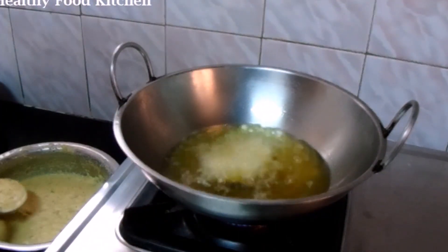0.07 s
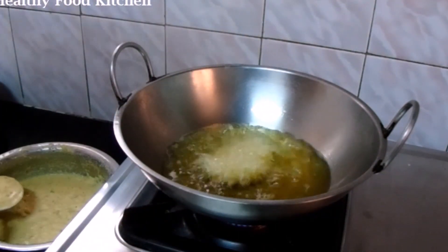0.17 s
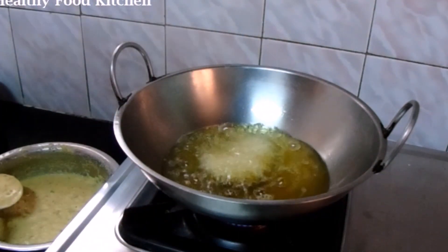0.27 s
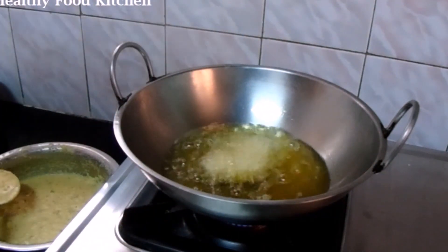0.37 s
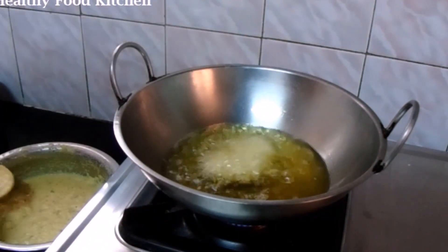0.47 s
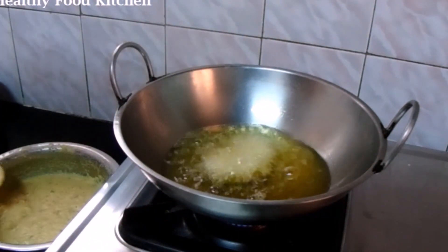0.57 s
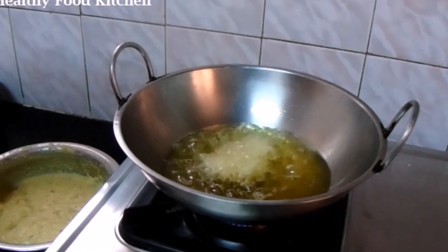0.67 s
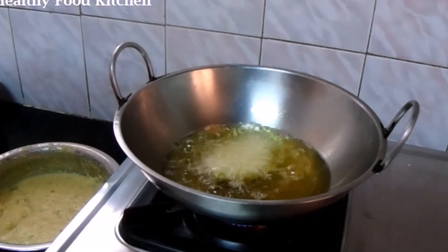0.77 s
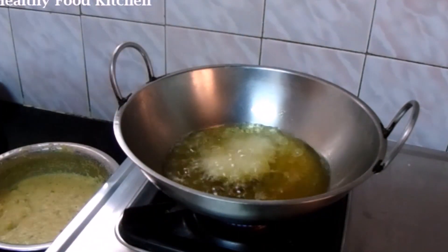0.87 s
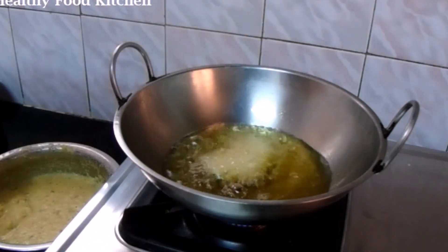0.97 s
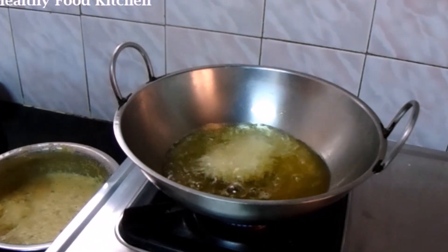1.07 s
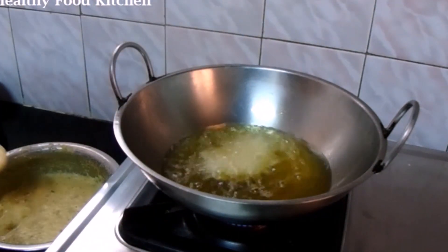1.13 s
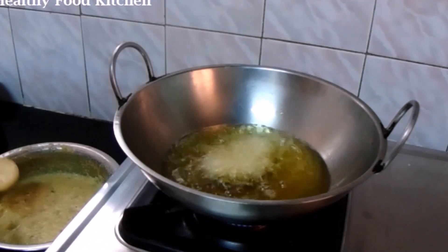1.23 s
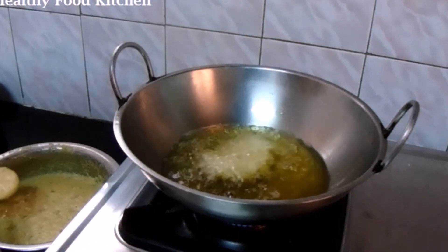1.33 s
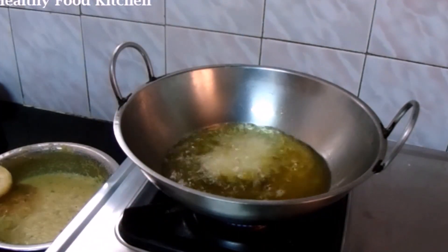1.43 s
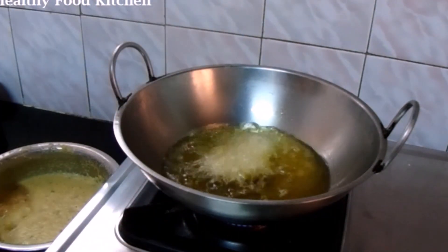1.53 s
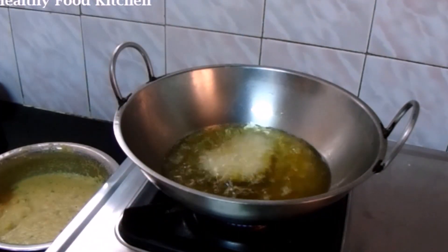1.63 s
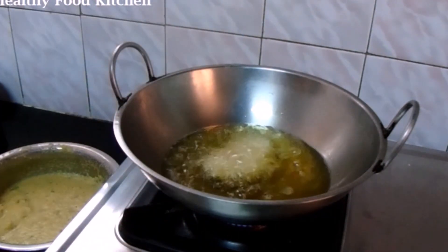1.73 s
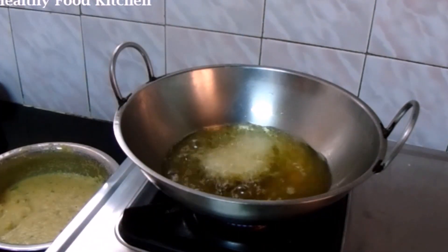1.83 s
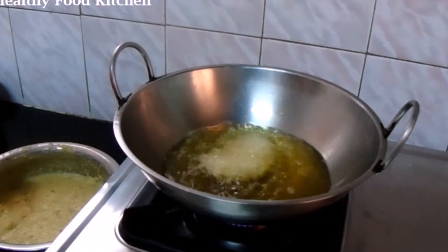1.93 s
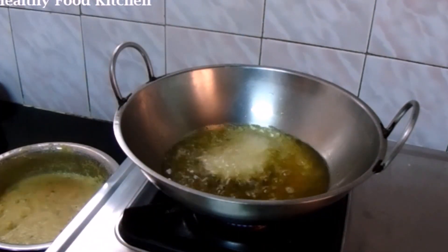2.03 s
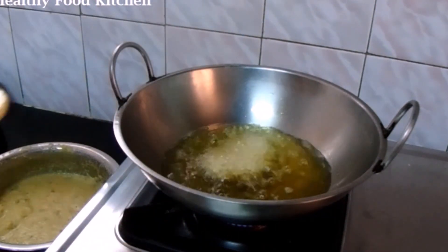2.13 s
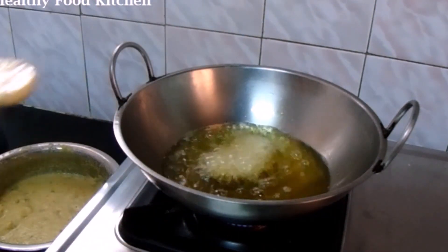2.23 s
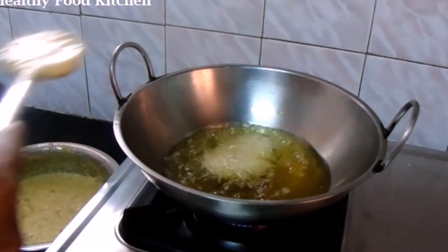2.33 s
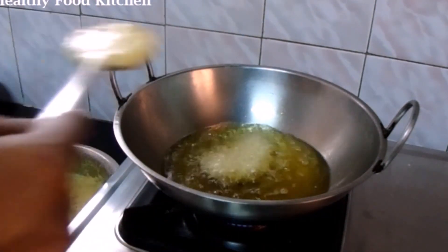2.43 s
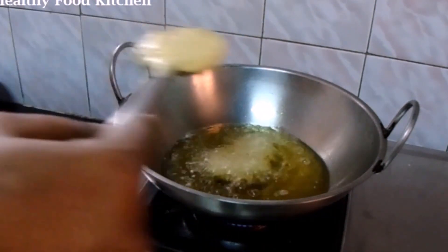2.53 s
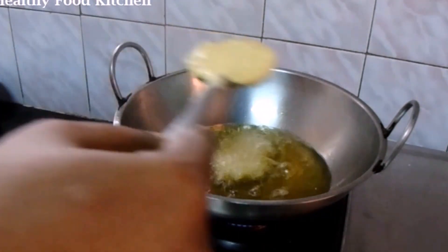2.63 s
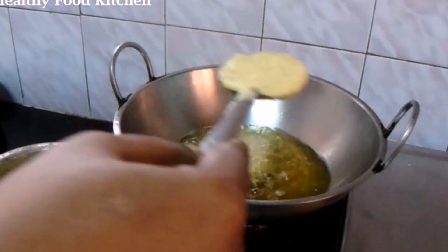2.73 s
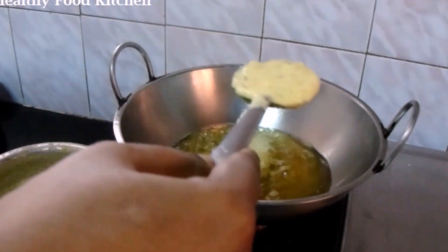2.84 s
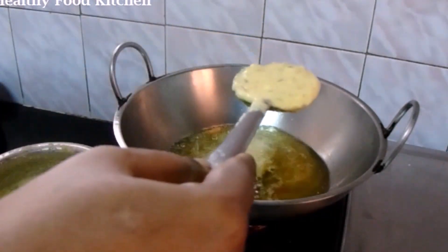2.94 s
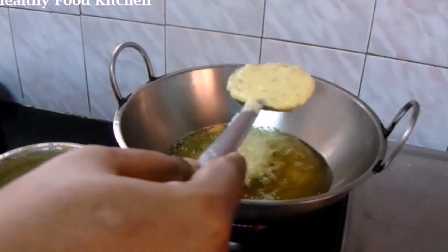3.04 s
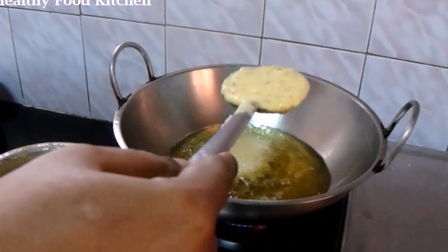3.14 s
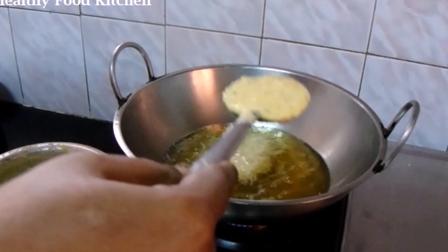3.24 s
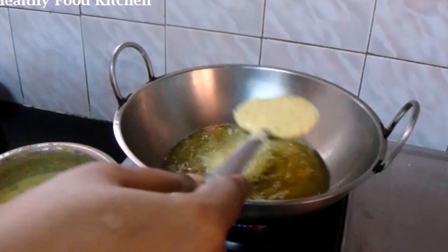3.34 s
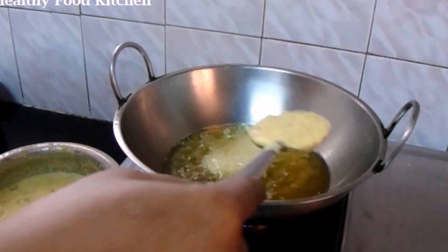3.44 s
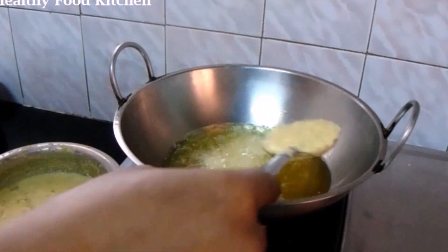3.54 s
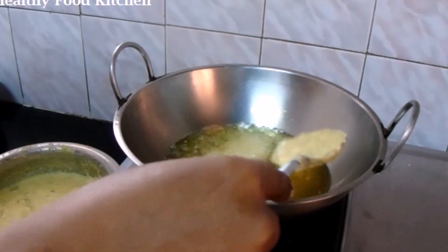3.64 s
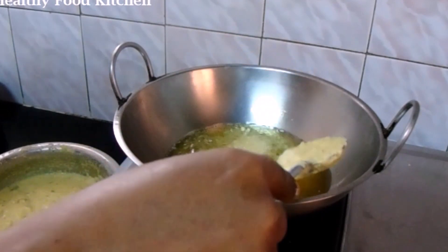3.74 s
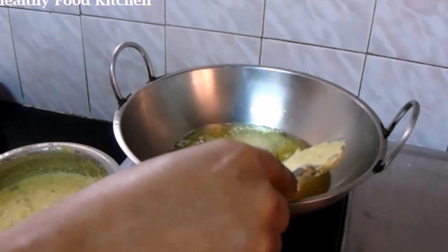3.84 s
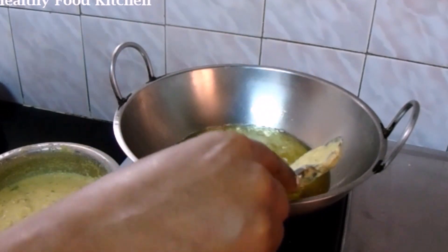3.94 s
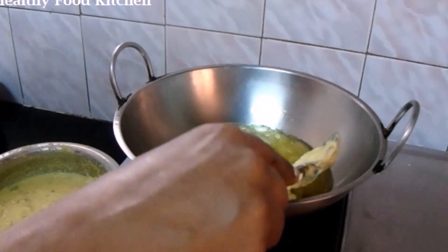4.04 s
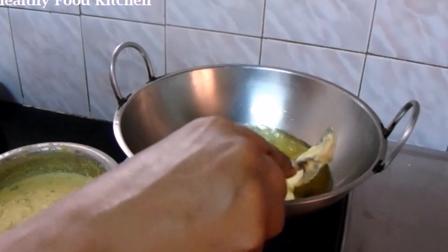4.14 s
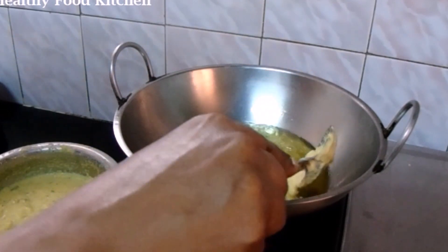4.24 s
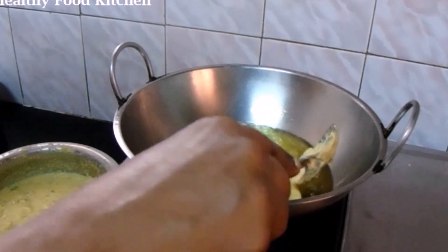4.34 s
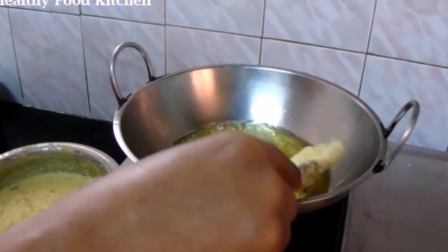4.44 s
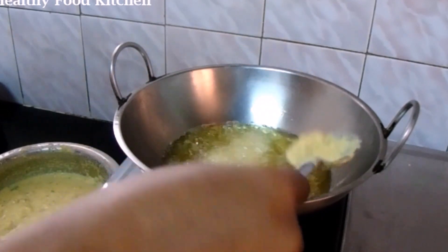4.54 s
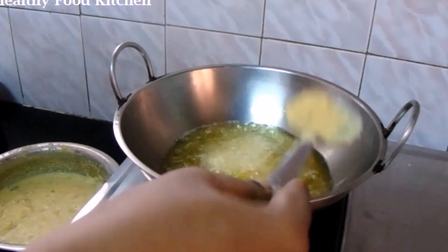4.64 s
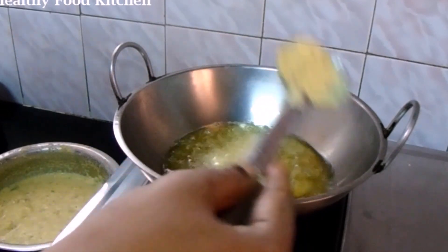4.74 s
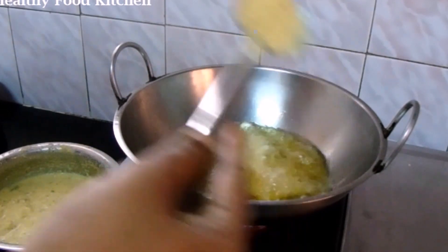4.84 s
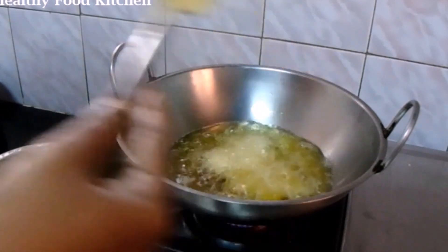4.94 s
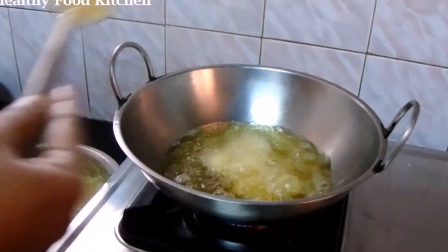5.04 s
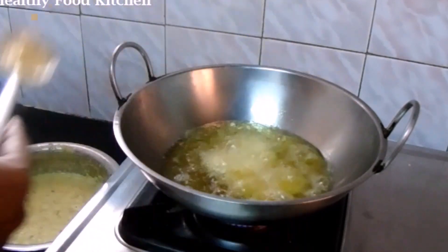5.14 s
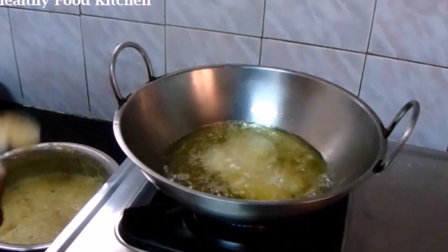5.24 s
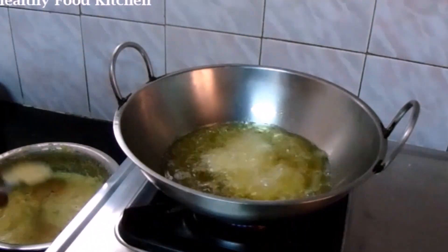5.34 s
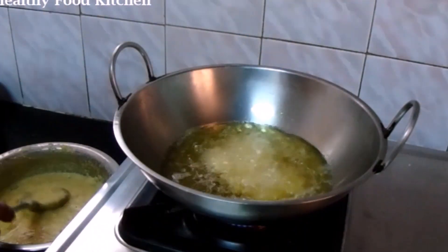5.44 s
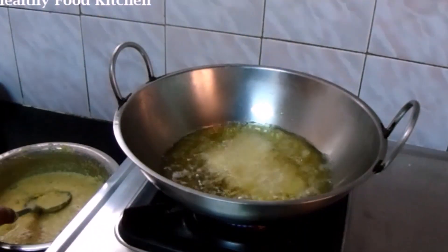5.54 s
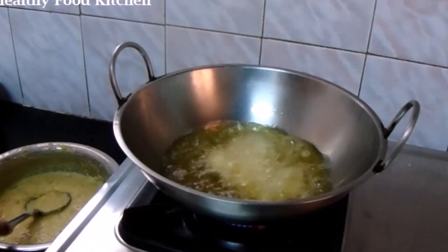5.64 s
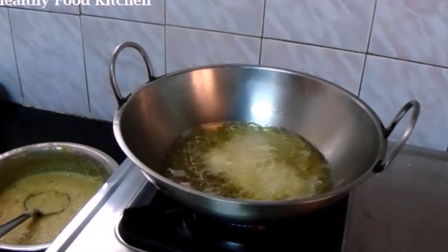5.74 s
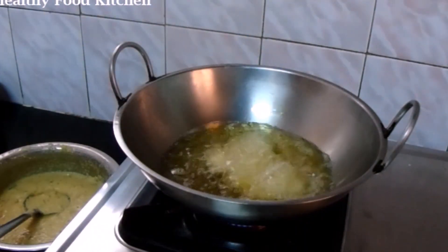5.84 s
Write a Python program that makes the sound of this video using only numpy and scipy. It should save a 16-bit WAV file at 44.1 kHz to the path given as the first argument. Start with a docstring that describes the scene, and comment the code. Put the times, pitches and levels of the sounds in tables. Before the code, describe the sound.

Batter sizzles and crackles in a wok of hot oil, swelling louder and brighter as another ladleful slides in.

```python
"""Batter frying in a wok

A steel wok of hot oil sits on a humming gas ring in a tiled kitchen. Countless steam bubbles burst
and ring in the bowl, with a few sharper spits, ringing blips and brief, hollow stutters. At about
four seconds a second ladle of batter slides in, and the sizzle swells and brightens."""
import sys
import numpy as np
from scipy import signal
from scipy.fft import rfft, irfft
from scipy.io import wavfile

SR = 44100
rng = np.random.default_rng(int(sys.argv[2]) if len(sys.argv) > 2 else 0)


def transcribe(u):
    """Save the signal u as a 16-bit wav file named by the first command-line argument.

    u: samples, shape (n,) or (channels, n), limited to [-1, 1]; the rate is SR.
    q: integer samples, one column per channel.
    """
    v = np.clip(np.atleast_2d(u).T, -1, 1)
    q = np.round(v * 32767).astype(np.int16)
    wavfile.write(sys.argv[1], SR, q)


N = 260190
TIME = np.arange(N) / SR
SEALED_S, SEAL_TAKES_S = 4.88, 0.19  # when the skin of the fresh batter seals, and how long it takes


def from_db(db):
    """Turn decibels into a factor to multiply by."""
    return 10 ** (np.asarray(db) / 20)


def rms_one(x):
    """Scale a sound to an average strength (rms) of one."""
    return x / np.sqrt(np.mean(x ** 2) + 1e-20)


def band(x, low_hz, high_hz):
    """The part of a sound between two frequencies."""
    edges = [max(low_hz, 10), min(high_hz, .45 * SR)]
    return signal.sosfilt(signal.butter(2, edges, "band", fs=SR, output="sos"), x + 1e-18)


def below(x, edge_hz):
    """The part of a sound under a frequency."""
    return signal.sosfiltfilt(signal.butter(4, edge_hz, fs=SR, output="sos"), x)


def colour(x, spectrum):
    """Turn the lows and highs of a sound up or down along a curve."""
    hz, db = np.transpose(spectrum)
    bins = np.maximum(np.fft.rfftfreq(N, 1 / SR), 1)
    return irfft(rfft(x) * from_db(np.interp(np.log(bins), np.log(hz), db)), N)


def resonate(x, hz, width_hz):
    """Let a sound ring at one pitch; the narrower the width, the longer it rings."""
    return signal.lfilter(*signal.iirpeak(hz, hz / width_hz, fs=SR), x + 1e-18)


def ramp(start_s, length_s):
    """A straight rise from zero to one."""
    return np.clip((TIME - start_s) / length_s, 0, 1)


def drift(per_s):
    """A random wander of about one either way, turning `per_s` times a second."""
    points = rng.standard_normal(4096)
    return rms_one(np.interp(TIME * per_s, np.arange(len(points)), points))


def bursts(per_s, spread_db):
    """Clicks at random moments; a few are much louder than the rest (softer if the spread is negative)."""
    when, size, sign = rng.spawn(1)[0].random((int(per_s * N / SR) + 1, 3)).T
    rarity = np.minimum(-np.log(1 - size), 5)
    height = from_db(spread_db * rarity) * np.sign(sign - .5)
    return rms_one(np.bincount((when * N).astype(int), height, N))


def immersed(drop_share=0.3):
    """How much of the fresh batter is in the oil: it slides in, then the rest drops off the ladle."""
    slide, drop = ramp(start_s=3.81, length_s=0.37), ramp(start_s=4.35, length_s=0.067)
    return (1 - drop_share) * slide + drop_share * drop


def wetness():
    """One until the skin of the fresh batter seals, zero afterwards."""
    return 1 - ramp(SEALED_S, SEAL_TAKES_S)


def frying(drying_db_per_s=0.43):
    """Strength of large, middling and fine bubbles: the first fritter's plus the fresh batter's."""
    drying, fresh = from_db(-drying_db_per_s * TIME), immersed()
    large = np.hypot(from_db(-46.5) * drying, from_db(-49.5) * fresh)
    middling = np.hypot(from_db(-39) * drying, from_db(-36) * fresh)
    fresh_fizz = np.hypot(from_db(-42), from_db(-35) * wetness())  # wet batter fizzes more
    fine = np.hypot(from_db(-46.5), fresh_fizz * fresh ** 2)
    return large, middling, fine


def reflections(x, echo_db, fade_s=0.038):
    """Bubbles burst all over the pan, so their echoes off bowl and tiles blur into a dying hiss."""
    keep = from_db(-120 / (fade_s * SR))  # the echo falls 60 dB in fade_s
    energy = signal.lfilter([1 - keep], [1, -keep], x ** 2 + 1e-18)
    return x + from_db(echo_db) * np.sqrt(energy) * rng.standard_normal(len(x))


def room_tone(level_db):
    """The faint, low rumble of the kitchen."""
    # Tone of the room's noise: f/Hz, relative level/dB
    rumble = [(20, 8.5), (40, 5.5), (80, 3.5), (130, -6.5), (250, -17), (500, -19), (2000, -113)]
    return from_db(level_db) * rms_one(colour(rng.standard_normal(N), rumble))


def burner(hz, note_db, waver_db, noise_db):
    """The gas ring sings one steady note with a little noise around it."""
    level = from_db(note_db + waver_db * drift(per_s=7.8))
    note = np.sqrt(2) * np.sin(2 * np.pi * hz * TIME) * level
    noise = rms_one(resonate(rng.standard_normal(N), hz, width_hz=44))
    return note + from_db(noise_db) * noise


def faint_tones(waver_share, flutter_db):
    """Thin, short tones swell, glide and fade, half hidden by the frying."""
    # Gliding tones: t/s, length/s, starting f/Hz, final f/Hz, level/dB
    glides = [(1.197, 0.24, 528, 601, -50), (1.431, 0.28, 630, 612, -51), (1.898, 0.095, 448, 495, -52.5),
              (4.241, 0.039, 725, 696, -41), (4.315, 0.146, 615, 558, -49.5), (4.574, 0.11, 585, 513, -52)]
    out, wavering = np.zeros(N), 1 + waver_share * drift(per_s=53)
    for s, length, start_hz, end_hz, level_db in glides:
        progress = ramp(s, length)
        hz = (start_hz + (end_hz - start_hz) * progress) * wavering
        swell = np.sqrt(2 * np.abs(np.sin(np.pi * progress)))
        out += from_db(level_db) * swell * np.sin(2 * np.pi * np.cumsum(hz) / SR)
    return out * rms_one(from_db(flutter_db * drift(per_s=35)))


def scoop(start_s, rise_s, fall_s, level_db):
    """The ladle dips into the bowl of thick batter with a soft squelch."""
    swell = ramp(start_s, rise_s) * (1 - ramp(start_s + rise_s, fall_s))
    clicks = bursts(per_s=6700, spread_db=5.0)
    squelch = band(clicks, low_hz=406, high_hz=1200) + from_db(-5) * band(clicks, low_hz=115, high_hz=190)
    return rms_one(squelch) * from_db(level_db) * swell


def pings(length_s):
    """In some of the sizzle's stutters a few clear pitches stand out."""
    # Short, pure tones: middle t/s, f/Hz, level/dB
    tones = [(0.356, 1470, -53), (0.98, 2410, -42), (0.984, 2750, -43), (1.123, 1500, -45),
             (4.15, 2200, -36.5), (4.159, 6090, -39), (4.244, 6020, -42), (4.312, 6230, -44),
             (4.378, 6360, -38), (4.376, 5940, -34.5), (4.374, 2070, -40.5), (5.024, 2220, -42),
             (5.812, 7240, -38.5)]
    out = np.zeros(N)
    for s, hz, level_db in tones:
        swell = np.sin(np.pi * ramp(s - length_s / 2, length_s))
        out += from_db(level_db) * np.sqrt(2) * swell * np.sin(2 * np.pi * hz * TIME)
    return out


def ticks(per_s, bright_db, dull_db):
    """Bubbles at the near edge of the pan snap as single dry ticks, louder as the frying grows."""
    bright = rms_one(band(bursts(per_s, spread_db=-4.5), low_hz=5610, high_hz=10540))
    dull = rms_one(band(bursts(per_s, spread_db=7.0), low_hz=1834, high_hz=6130))
    _, middling, fine = frying()
    return bright * fine * from_db(bright_db) + dull * middling * from_db(dull_db)


def steam(start_s, hz, width_hz, start_db, fade_db_per_s, sputter_db):
    """Steam squeezes out from under the wet batter in a narrow hiss, until the skin seals."""
    jet = band(bursts(per_s=14000, spread_db=1.5), hz - width_hz / 2, hz + width_hz / 2)
    level_db = start_db - fade_db_per_s * (TIME - start_s) + sputter_db * drift(per_s=81)
    return rms_one(jet) * from_db(level_db) * ramp(start_s, length_s=0.046) * wetness()


def spits_and_blips(crack, uneven_db):
    """Sharp spits, and a few brief ringing blips in the sizzle: each a crack and a dying, pitched hiss."""
    # Spits and ringing blips: t/s, peak level/dB, f/Hz, fading time/s
    events = [(0.018, -22, 9000, 0.0059), (0.179, -25.5, 11200, 0.017), (0.274, -35, 3300, 0.0024),
              (0.366, -26, 6540, 0.039), (0.644, -15.5, 3370, 0.00057), (0.645, -20, 3770, 0.0017),
              (0.69, -23, 2290, 0.0024), (0.976, -27.5, 2530, 0.018), (1.026, -29, 5760, .0012),
              (1.027, -24, 7500, 0.017), (1.496, -38, 2700, 0.0031), (1.695, -24, 4200, 0.002),
              (2.171, -23, 10300, 0.011), (2.184, -26.5, 1610, 0.011), (2.392, -23.5, 3840, 0.0053),
              (2.54, -23.5, 1820, 0.0045), (2.648, -33, 820, 0.019), (2.832, -38, 2600, .0015),
              (2.881, -27, 3970, 0.007), (2.93, -20, 8500, 0.0019), (3.105, -27.5, 7990, 0.0085),
              (3.172, -27, 7700, 0.014), (3.21, -19, 9000, 0.0014), (3.473, -26, 9050, 0.0073),
              (3.893, -18.5, 3070, 0.0018), (3.95, -23.5, 6500, .0017), (4.018, -29.5, 1600, .003),
              (4.127, -29.5, 2220, 0.05), (4.339, -19, 9200, 0.0093), (4.643, -22, 4500, 0.0057),
              (4.792, -15.5, 7300, 0.0069), (4.796, -25.5, 2220, .016), (4.861, -17.5, 6300, .003),
              (4.868, -17, 8800, 0.0045), (5.205, -16, 8000, 0.033), (5.424, -22, 2506, 0.019),
              (5.488, -16.5, 2520, .002), (5.495, -19, 2400, .002), (5.713, -20, 3020, 0.0032),
              (5.754, -19, 3960, 0.0096), (5.77, -17, 3000, 0.0026)]
    out, t = np.zeros(N), TIME[:SR // 5]
    for s, peak_db, hz, fade_s in events:
        width_hz = hz * 0.8 * (0.004 / fade_s) ** 0.88  # longer ones have a clearer pitch
        grains, sizes = rng.standard_normal((2, len(t)))
        burst = rms_one(grains * from_db(uneven_db * sizes)) * np.exp(-t / fade_s)
        burst[0] += crack
        hiss = resonate(reflections(burst, echo_db=-19), hz, width_hz)
        hiss = band(hiss, low_hz=max(hz / 2 - width_hz / 2, hz / 3), high_hz=hz * 1.5 + width_hz)
        start = round(s * SR)
        out[start:start + len(t)] += (from_db(peak_db) * hiss / np.abs(hiss).max())[:N - start]
    return out


def hollow_ring(x, low_hz, high_hz, count, spacing_hz=130, chance_db=5):
    """A stretch of sizzle narrowed to a few of its stronger pitches, other ones each time."""
    strength, hz = np.abs(rfft(x)), np.fft.rfftfreq(len(x), 1 / SR)
    luck, phase = from_db(chance_db * rng.standard_normal(len(hz))), rng.random(len(hz))
    in_range = strength * (hz > low_hz) * (hz < high_hz)
    peaks, _ = signal.find_peaks(in_range, distance=max(spacing_hz / hz[1], 1))
    chosen = peaks[np.argsort(-(strength * luck)[peaks])[:count]]
    cycles = np.outer(hz[chosen], TIME[:len(x)]) + phase[chosen, None]
    return strength[chosen] @ np.sin(2 * np.pi * cycles)


def stutter(x, treble_hz, ring_db, overhang_s, give_way_db):
    """The sizzle thins for an instant, in the treble, lower down, or both; a hollow ring fills the gap."""
    # Dips in the sizzle: middle t/s, length/s, loss below the treble/dB, treble loss/dB, ring boost/dB
    dips = [(0.353, 0.016, 8, 18, 0.5), (0.401, 0.016, 11, 12, -1.5), (0.426, .012, 1, 19, 0),
            (0.453, 0.019, 16, 0, -3), (0.532, 0.024, 26, 22, 2), (0.619, 0.015, 6, 27, 1),
            (0.755, 0.0091, 11, 4, 1.5), (0.841, 0.021, 21, 11, -1), (0.895, 0.016, 13, 11, -1.5),
            (0.984, 0.027, 20, 29, 2), (1.123, 0.021, 5, 7, -1), (1.161, 0.017, 2, 3, -2.5),
            (1.297, 0.035, 4, 11, -3), (1.329, 0.014, 14, 7, -1), (1.544, .013, 9, 0, -13),
            (1.679, 0.012, 5, 14, 0), (1.74, 0.013, 8, 21, 2), (1.789, 0.032, 22, 51, -0.5),
            (1.929, 0.0078, 4, 21, 2), (2.015, 0.012, 9, 4, 2), (2.062, 0.02, 19, 15, -1),
            (2.317, 0.012, 2, 15, -1), (2.412, 0.0082, 15, 13, 1), (2.467, 0.019, 13, 8, -1),
            (2.693, 0.011, 7, 10, -3), (2.975, 0.012, 11, 5, 0), (3.007, 0.018, 9, 9, -5.5),
            (3.123, 0.0097, 9, 9, -0.5), (3.232, 0.0086, 6, 6, -0.5), (3.257, 0.017, 2, 10, -1.5),
            (3.401, 0.013, 13, 12, -2.5), (3.422, 0.013, 7, 13, -1.5), (3.555, 0.022, 6, 19, 0),
            (3.592, 0.028, 13, 18, -3), (3.742, 0.009, 22, 10, -8.5), (3.789, .022, 30, 7, -0.5),
            (3.929, 0.014, 8, 14, -1), (4.154, 0.022, 20, 13, -2.5), (4.245, 0.031, 13, -3, -2.5),
            (4.318, 0.011, 1, 0, 0), (4.376, 0.025, 34, 4, -6.5), (4.955, 0.027, 6, 5, -11),
            (4.984, .012, 6, 17, -2), (5.022, 0.0072, 7, 22, -1), (5.046, 0.0105, 6, 12, -6),
            (5.087, 0.0086, 16, 4, -7), (5.168, 0.018, 11, -4, -3), (5.338, 0.014, 1, 11, -0.5),
            (5.402, 0.023, 13, 19, -2), (5.469, .013, 14, -3, -1.5), (5.556, 0.015, 9, -1, 1),
            (5.616, 0.0088, 16, 3, -10), (5.658, 0.015, 2, 4, -1.5), (5.811, 0.01, 14, 23, -2)]
    body_db, treble_db, rings = np.zeros((3, N))
    for s, length, loss_db, treble_loss_db, boost_db in dips:
        near = slice(max(int((s - .12) * SR), 0), int((s + .06) * SR))
        t = TIME[near] - s
        gap = np.exp(-(2 * t / length) ** 4)
        # The ring reaches past both ends of the gap, and the sizzle gives way as it swells.
        swell = np.cos(np.pi / 2 * np.clip(t / (length / 2 + overhang_s), -1, 1))
        body_db[near] -= loss_db * gap + give_way_db * swell
        treble_db[near] -= treble_loss_db * gap + give_way_db * swell
        low_ring = hollow_ring(x[near] * swell, low_hz=800, high_hz=6580, count=9)
        high_ring = hollow_ring(x[near] * swell, low_hz=6760, high_hz=12000, count=3)
        ring = low_ring + from_db(min(-1 - treble_loss_db, 0) / 2) * high_ring
        rings[near] += from_db(ring_db + boost_db) * x[near].std() * rms_one(ring) * swell
    body = below(x, treble_hz)
    return body * from_db(body_db) + (x - body) * from_db(treble_db) + rings


def wok(x, waver_db):
    """The steel bowl boosts its own pitches, each more when bubbles are near where it moves most."""
    # Pitches of the bowl: f/Hz, width/Hz, boost/dB, boost with the fresh batter in/dB
    resonances = [(446, 38, 8.5, 7), (593, 72, 10, 11.5), (718, 32, 9, 8), (868, 50, 14, 11.5),
                  (984, 37, 11.5, 13.5), (1113, 18, 8.5, 12), (1278, 118, 7.5, 11), (1446, 30, 7, 4),
                  (1526, 107, 10.5, 9), (1614, 38, 2.5, 2), (1754, 19, 2, 1), (1960, 34, 3, 3),
                  (2100, 90, 1, 4.5), (2222, 110, 6.5, 8), (2414, 26, 3, 1), (2665, 120, 6, 6),
                  (2739, 43, 4, 3.5), (2795, 27, 6, 5), (2896, 19, 5, 4), (3012, 25, 3, 2),
                  (3193, 20, 7.5, 3.5), (3470, 110, 4, 4.5), (3795, 130, 2.7, 3.5), (4255, 100, 3.5, 5.5),
                  (4610, 130, 4.5, 3.5), (4850, 160, 2.7, 2), (6300, 400, 2, 3)]
    fresh = immersed()
    for hz, width_hz, boost_db, fresh_boost_db in resonances:
        boost = from_db(boost_db) * (1 - fresh) + from_db(fresh_boost_db) * fresh
        nearness = rms_one(from_db(waver_db * drift(per_s=16)))
        x = x + (boost - 1) * resonate(x * nearness, hz, width_hz)
    return x


def bubbles(most_per_s, spread_db, clumping, snap_share):
    """Each size of bubble bursts in clumps and rings in its own band; snapping films sound in all."""
    edges_hz = np.r_[np.geomspace(125, 4000, 10), np.geomspace(4000, 15000, 8)[1:]]
    snaps = bursts(per_s=240, spread_db=3.3)
    out = 0
    for low_hz, high_hz in zip(edges_hz, edges_hz[1:]):
        # Small bubbles far outnumber large ones and come in tighter clumps.
        smallness = np.sqrt(low_hz / edges_hz[-1])
        clump_db = clumping * (2.0 + 6.5 * smallness ** 2)
        clumps = rms_one(from_db(clump_db * drift(per_s=90)))
        pops = bursts(most_per_s * smallness, spread_db) * clumps
        out = out + band(reflections(pops + snap_share * snaps, echo_db=1.5), low_hz, high_hz)
    return out


def sizzle(old_db_per_s, fresh_db_per_s):
    """Water boils out of the batter as large, middling and fine bubbles that ring in the wok."""
    # Tone of bubbles bursting in oil: f/Hz, relative level/dB
    bubble_tone = [(140, -14.5), (250, -15.5), (380, -16), (600, -13.5), (1100, -13), (1900, -5),
                   (3000, -1), (4500, -1.5), (5800, -2.5), (7500, -7), (10500, -7.5), (12000, -14.5),
                   (14500, -21)]
    oil = rms_one(bubbles(most_per_s=5000, spread_db=3.0, clumping=0.55, snap_share=0.36))
    oil = colour(wok(oil, waver_db=2.0), bubble_tone)
    # The top treble rises as bubbles get finer: while the first fritter dries, and once the next seals.
    old_age, fresh_age = TIME * (1 - immersed()), np.maximum(TIME - SEALED_S, 0)
    sparkle_db = -6.5 + old_db_per_s * old_age + fresh_db_per_s * fresh_age
    oil = oil + (from_db(sparkle_db) - 1) * (oil - below(oil, edge_hz=9200))
    large, middling, fine = frying()
    lows, below_top = below(oil, edge_hz=1654), below(oil, edge_hz=7000)
    mids, highs = below_top - lows, oil - below_top
    return large * rms_one(lows) + middling * rms_one(mids) + fine * rms_one(highs)


def scene():
    """The frying wok over the burner in the quiet kitchen, in one channel."""
    pan = sizzle(old_db_per_s=1.57, fresh_db_per_s=10.5)
    pan += ticks(per_s=47, bright_db=-11.5, dull_db=-18)
    pan += steam(start_s=4.075, hz=6200, width_hz=1050, start_db=-38.5, fade_db_per_s=4, sputter_db=0.5)
    pan += spits_and_blips(crack=3.5, uneven_db=5.5)
    pan = stutter(pan, treble_hz=6650, ring_db=-1.5, overhang_s=.015, give_way_db=4)
    pan += pings(length_s=.05)
    background = room_tone(level_db=-69)
    background += burner(hz=295.1, note_db=-53.5, waver_db=1.5, noise_db=-62)
    background += faint_tones(waver_share=0.0297, flutter_db=3.5)
    background += scoop(start_s=5.74, rise_s=0.026, fall_s=0.051, level_db=-38)
    return (pan + background)[None]


def record(dry):
    """The very highest treble is cut off steeply."""
    cutoff_hz = 14350
    return signal.sosfilt(signal.ellip(12, .1, 90, cutoff_hz, fs=SR, output="sos"), dry)


dry = scene()
out = record(dry)
transcribe(out)
```